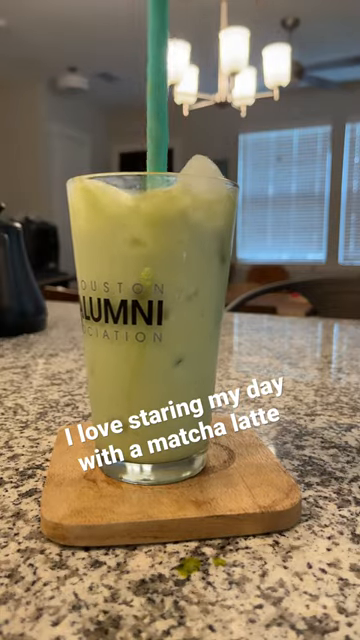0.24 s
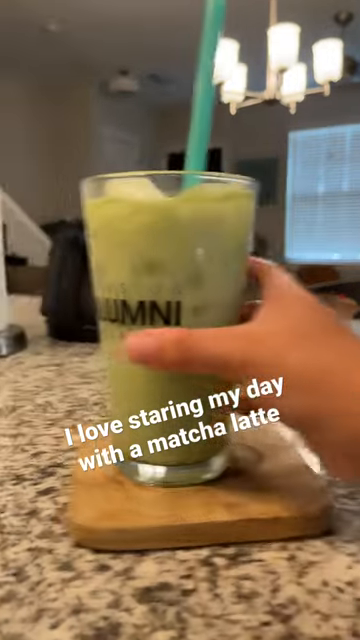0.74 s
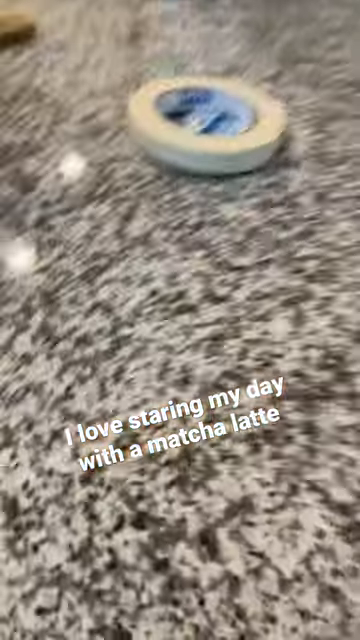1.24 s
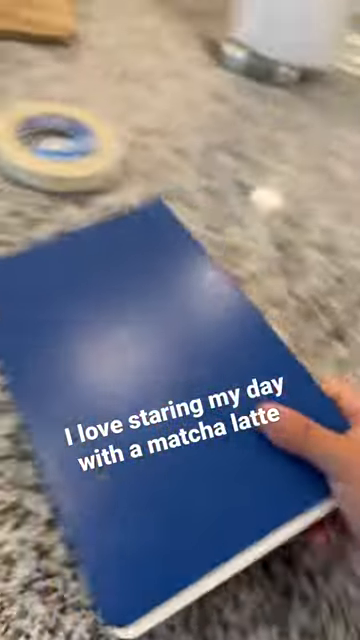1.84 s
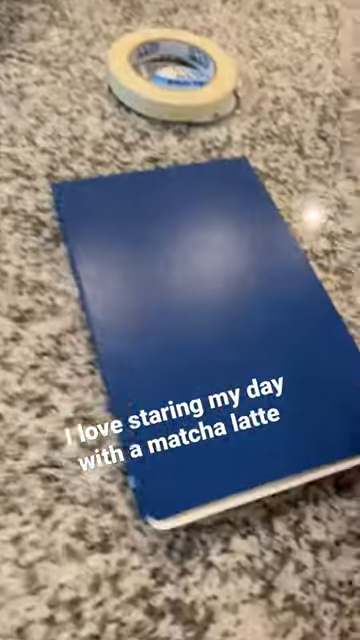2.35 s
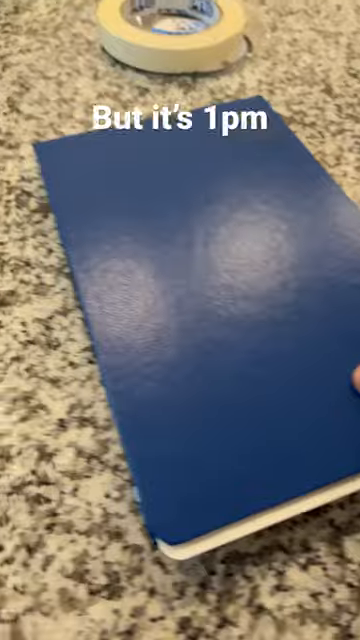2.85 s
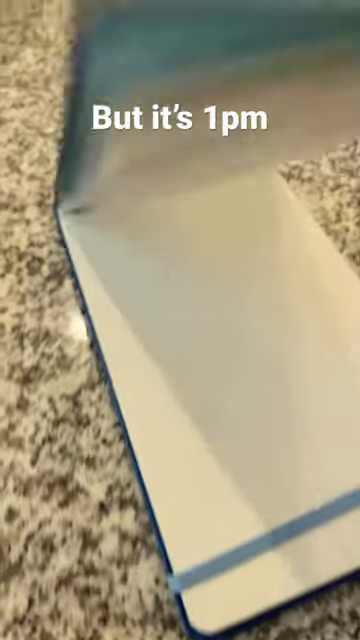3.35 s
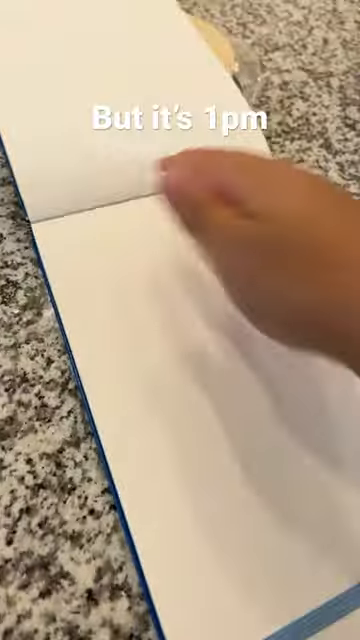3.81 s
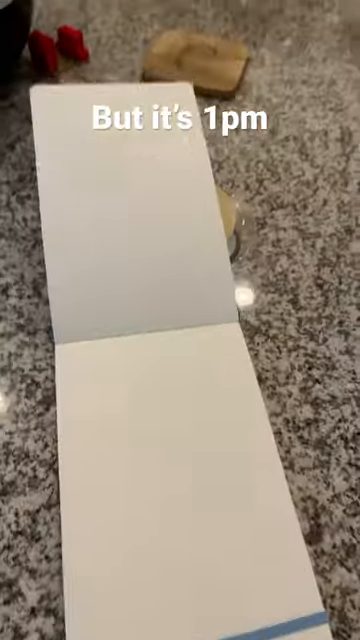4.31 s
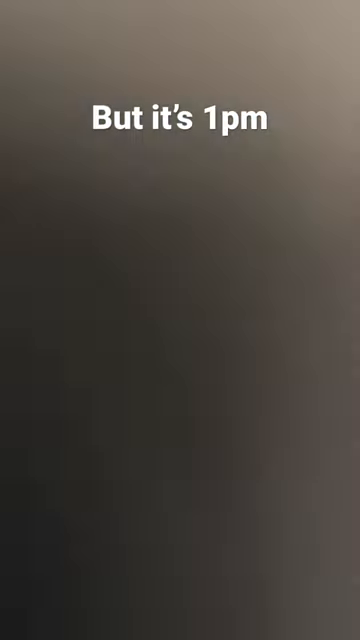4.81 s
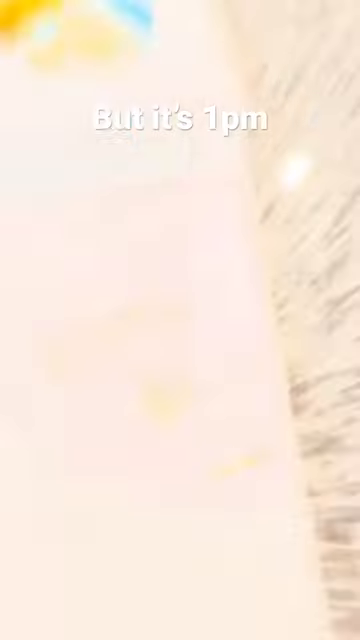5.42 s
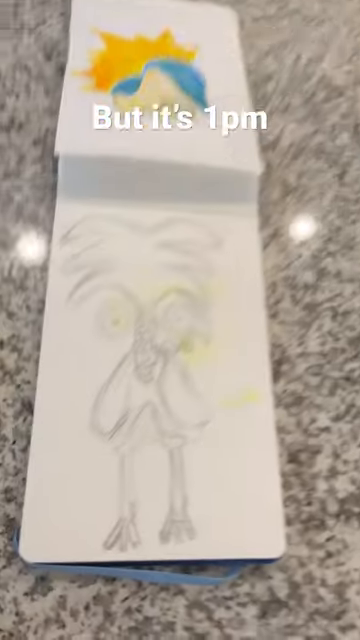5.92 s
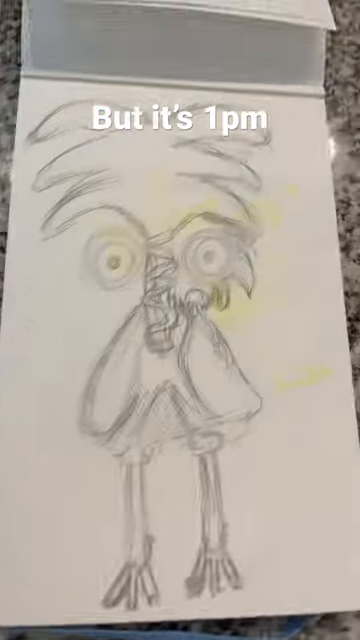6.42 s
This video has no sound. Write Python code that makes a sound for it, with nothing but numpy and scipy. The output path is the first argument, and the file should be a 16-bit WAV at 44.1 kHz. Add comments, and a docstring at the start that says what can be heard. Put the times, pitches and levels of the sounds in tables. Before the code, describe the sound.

Ice clinks in a stirred drink, a coaster scrapes on stone, then a sketchbook thuds, slaps open and the microphone is bumped.

```python
"""Ice swirls and clinks as a straw stirs a full glass, heard from a phone's microphone in a quiet kitchen.
The glass is dragged off on its wooden coaster, which grinds and catches on the stone counter.
A sketchbook slides in, drops flat with a thud and is flipped open, its cover slapping down.
Right at the microphone, the phone bumps onto the page and is tapped. Ventilation and a faint
appliance hum lie underneath; twice everything cuts to silence for an instant."""
import sys
import numpy as np
from scipy import signal
from scipy.fft import rfft, irfft
from scipy.io import wavfile
from scipy.ndimage import uniform_filter1d

SR = 44100
rng = np.random.default_rng(int(sys.argv[2]) if len(sys.argv) > 2 else 0)


def put_to_file(sound):
    """Save the sound as 16-bit audio at rate SR, in the file named by the first command-line argument."""
    columns = np.atleast_2d(sound).T  # one column per channel
    safe = np.clip(columns, -1, 1)
    whole_steps = np.round(safe * 32767)
    wavfile.write(sys.argv[1], SR, whole_steps.astype(np.int16))


N = 293706
TIME = np.arange(N) / SR
AGE = TIME[:SR // 2]  # seconds since a blow


def amp(db):
    """Decibels to gain."""
    return 10 ** (np.asarray(db) / 20)


def unit(x):
    """Scales to rms 1."""
    return x / np.sqrt(np.mean(x ** 2) + 1e-20)


def read(points, hz):
    """Reads a table on a log-frequency axis."""
    f, value = np.transpose(points)
    return np.interp(np.log(hz + 1), np.log(f + 1), value)


def level(rows):
    """Gain over time from a dB curve, fading 200 dB a second outside its span."""
    s, db = np.transpose(rows)
    outside = abs(TIME - np.clip(TIME, s[0], s[-1]))
    return amp(np.interp(TIME, s, db) - 200 * outside)


def add(mix, s, sound):
    """Mixes a sound in at s seconds."""
    part = mix[max(round(s * SR), 0):][:len(sound)]
    part += sound[:len(part)]


def colour(x, spectrum, peaks=(), peak_db=0):
    """Minimum-phase filter of energy 1: a broad spectrum with resonances standing out of it."""
    hz = abs(np.fft.fftfreq(4096, 1 / SR))
    gain = amp(read(spectrum, hz))
    for f, width, db in peaks:
        gain *= 1 + amp(peak_db + db / 2) / (1 + (2 * (hz - f) / width) ** 2)
    response = np.exp(signal.hilbert(np.log(gain + 1e-6)).conj())
    taps = np.fft.ifft(response).real[:len(hz) // 2]
    return signal.oaconvolve(x, taps / np.linalg.norm(taps))[:len(x)]


def burst(t60):
    """A contact: a puff of noise that dies at once."""
    return rng.standard_normal(len(AGE)) * amp(-60 * AGE / t60)


def ring(modes, pitch=1, build=0.5):
    """Damped modes after a blow, rising over `build` cycles; a raised pitch also dies sooner."""
    t = AGE * pitch
    return sum(amp(db - 60 * t / t60) * np.sin(2 * np.pi * hz * t) * np.minimum(hz * t / build, 1)
               for hz, db, t60 in modes)


def grains(per_s, spread_db):
    """Tiny random contacts, a few larger than the rest."""
    size = amp(spread_db * np.minimum(rng.exponential(1, N), 4))
    return unit(size * rng.choice([-1, 1], N) * (rng.random(N) < per_s / SR))


def uneven(depth_db, span_s):
    """Random swings in the pressure of a rubbing contact."""
    knots = np.arange(0, N / SR + 1, span_s)
    return amp(depth_db * np.interp(TIME, knots, rng.standard_normal(N)[:len(knots)]))


def stroke(s, rise, hold, fall, db):
    """Gain of one movement: swells until s, fades from s + hold; rise and fall are seconds per 20 dB."""
    early, late = np.maximum(s - TIME, 0), np.maximum(TIME - s - hold, 0)
    return amp(db - 20 * (early / rise + late / fall))


def together(gains):
    """Unrelated noises add in power."""
    return np.linalg.norm(gains, axis=0)


# The kitchen's reverberation. Each row: frequency in Hz, seconds to fall 60 dB (t60).
ROOM_DECAY = [(80, 0.56), (250, 0.34), (700, 0.63), (2500, 0.79), (6000, 0.64), (14000, 0.3)]


def room(x, wet_db, early_db=4, early_s=.04):
    """What the walls return to the microphone: strong early reflections, then a tail dying by band."""
    t = TIME[:SR]
    onset = np.clip((t - .003) / 0.008, 0, 1)
    taps = rng.standard_normal(SR) * onset * amp(early_db * np.exp(-t / early_s))
    taps /= np.linalg.norm(taps * amp(-90 * t))
    hz, age, bands = signal.stft(taps, SR, nperseg=256)
    decay = amp(-60 * age / read(ROOM_DECAY, hz)[:, None])
    tail = signal.istft(bands * decay, SR, nperseg=256)[1]
    return amp(wet_db) * signal.fftconvolve(x, tail)[:N]


def strikes(rows, modes, crack, echo, crack_t60, wet_db, build):
    """Each blow is a short crack plus the ring of the struck thing, and wakes the room by its strength."""
    rings, cracks, pushes = np.zeros((3, N))
    for s, ring_db, crack_db, *pitch in rows:
        add(rings, s, amp(ring_db) * ring(modes, *pitch, build=build))
        add(cracks, s, amp(crack_db) * burst(crack_t60))
        add(pushes, s, amp([ring_db]))
    return rings + colour(cracks, crack) + room(colour(pushes, echo), wet_db)


# Pushes of the straw. Each row: peak time in seconds, relative level in dB.
STRAW_PUSHES = [(0.0, -44), (0.329, -49.5)]
# Tone of the swirl and of the ticks. Each row: frequency in Hz, relative level in dB.
SWIRL_TONE = [(290, -41), (500, 8), (773, -4), (831, -2.5), (1440, 5.5), (2070, 0.5), (3200, 3.5),
              (3920, 1.5), (7640, -10), (16000, -35)]
TICK_TONE = [(290, -37), (500, -28), (750, 2), (831, -25), (1440, -1), (2100, -2), (3200, -4), (3540, 6.5),
             (7980, -6), (16000, -35)]
# Resonances of the full glass. Each row: frequency in Hz, width in Hz, weight in dB.
GLASS_PEAKS = [(1420, 300, -3.5), (2110, 210, 9), (2360, 49, 11), (3050, 50, -4), (3840, 85, -4),
               (5260, 230, -1), (7400, 210, -11)]
# Cubes hitting glass and each other. Each row: start in seconds, tick in dB, pitch in Hz, ring in dB.
CUBE_HITS = [(0.0886, -39, 2020, -43), (0.1295, -44, 6140, -42.5), (0.179, -57, 2460, -41),
             (0.233, -50, 1500, -36.5), (0.2485, -43, 2960, -37), (0.3058, -33, 2600, -30.5),
             (0.332, -27, 3800, -32), (0.3636, -29.5, 2050, -26), (0.385, -35.5, 2080, -34),
             (0.82, -39.5, 3460, -38), (0.9474, -40, 3440, -28.5), (1.017, -45, 3220, -32)]
# A cube's note. Each row: multiple of its pitch, relative level in dB, t60 in seconds.
CUBE_MODES = [(1, -2.5, 0.021), (.72, -16, 0.016), (1.75, -14.5, 0.027)]


def ice():
    """In the glass, each push of the straw sets small contacts swirling; whole cubes clink and ring."""
    contacts = grains(per_s=1500, spread_db=3.5) * uneven(depth_db=1.5, span_s=.008)
    motion = together([stroke(s, rise=0.073, hold=0, fall=0.44, db=db) for s, db in STRAW_PUSHES])
    motion *= stroke(0, rise=0.073, hold=0.47, fall=0.048, db=0.5)  # ends as the straw is let go
    swirl = unit(colour(contacts, SWIRL_TONE, GLASS_PEAKS, peak_db=-4)) * motion
    ticks, notes = np.zeros((2, N))
    for s, tick_db, hz, ring_db in CUBE_HITS:
        add(ticks, s, amp(tick_db) * burst(t60=0.012))
        modes = [(hz * multiple, db, t60) for multiple, db, t60 in CUBE_MODES]
        add(notes, s, amp(ring_db) * ring(modes))
    ticks = colour(ticks, TICK_TONE, GLASS_PEAKS, peak_db=-3)
    return amp(-2.5) * swirl + ticks + notes + room(swirl + notes, wet_db=-11) + room(ticks, wet_db=-3)


# The ventilation's tone. Each row: frequency in Hz, relative level in dB.
AIR_TONE = [(15, -51), (25, -46.5), (64, 1.5), (108, -10), (153, -2), (212, -3), (301, -0.5), (503, -9.5),
            (1020, -17), (1400, -26), (2550, -38.5), (9070, -39), (13600, -48.5), (14800, -39.5),
            (16000, -47)]
# Appliances in the background. Each row: frequency in Hz, rms level in dB.
APPLIANCE_HUM = [(160, -62), (318, -67), (1001, -82.5), (9022, -92.5)]


def room_tone():
    """All around the microphone: steady ventilation noise and a faint wavering hum."""
    tone = amp(read(AIR_TONE, np.fft.rfftfreq(N, 1 / SR)))
    out = amp(-56) * unit(irfft(rfft(rng.standard_normal(N)) * tone, N))
    for hz, db in APPLIANCE_HUM:
        waver_hz = 3 * unit(uniform_filter1d(rng.standard_normal(N), size=4000))
        out += amp(db) * np.sqrt(2) * np.sin(2 * np.pi * np.cumsum(hz + waver_hz) / SR)
    return out


# A nudge, then a growing pull. Each row: time in seconds, relative level in dB.
DRAG_EFFORT = [(.5, -70), (.572, -73), (.59, -48), (.65, -59.5), (.76, -56), (.825, -49), (.95, -48.5),
               (1.235, -45.5)]
# Tone of the grinding and of the low judder. Each row: frequency in Hz, relative level in dB.
GRIT_TONE = [(350, -24.5), (600, 4), (708, 8.5), (846, -8), (1260, 0), (2340, -10), (3340, -10), (5120, -6),
             (7830, -5), (16000, -18.5)]
JUDDER_TONE = [(40, -19), (90, 0.5), (200, 3), (380, 1), (520, -3), (650, -13), (900, -32), (2000, -22)]
# Resonances of the rubbed coaster. Each row: frequency in Hz, width in Hz, weight in dB.
COASTER_PEAKS = [(667, 22, -13), (1280, 210, -12), (3420, 450, 37), (5740, 420, 19), (6100, 66, -1),
                 (7080, 180, 13), (7830, 300, 17), (9500, 350, -4), (10800, 560, 15)]
# Catches on the stone. Each row: start in seconds, snap in dB, knock in dB.
COASTER_CATCHES = [(0.5785, -53, -39.5), (0.741, -37.5, -53), (0.806, -44, -49), (0.9735, -49, -41),
                   (1.1, -38, -43), (1.152, -44, -39), (1.165, -30.5, -37), (1.2195, -31.5, -37.5)]
# The knock of the wood. Each row: frequency in Hz, relative level in dB, t60 in seconds.
WOOD_MODES = [(634, 0.5, 0.027), (704, -4, 0.031), (1320, 1, 0.011)]


def coaster():
    """On the counter, wood grinds and judders over stone, catching now and then and singing in fits."""
    effort = level(DRAG_EFFORT)
    pressure = uneven(depth_db=3, span_s=.01) * effort
    grind = colour(grains(per_s=2200, spread_db=3) * pressure, GRIT_TONE) * amp(-4)
    fits = grains(per_s=2100, spread_db=3) * pressure * uneven(depth_db=3.5, span_s=.02)
    sing = colour(fits, GRIT_TONE, COASTER_PEAKS, peak_db=9) * amp(-6)
    judder = unit(colour(grains(per_s=1300, spread_db=0.5), JUDDER_TONE)) * amp(-27) * np.sqrt(effort)
    snaps, knocks = np.zeros((2, N))
    for s, snap_db, knock_db in COASTER_CATCHES:
        add(snaps, s, amp(snap_db) * burst(t60=0.012))
        add(knocks, s, amp(knock_db) * ring(WOOD_MODES))
    snaps = colour(snaps, [(500, 0), (3500, 7), (9000, 3), (16000, -10)])
    out = grind + sing + snaps + knocks + judder
    return out + room(out, wet_db=-11)


# Card, paper and sleeve sliding. Each row: peak time, rise, hold and fall in seconds, hiss and body in dB.
PAPER_STROKES = [(1.487, 0.17, 1.386, 0.36, -68.5, -65), (1.827, 0.027, 0.0092, .15, -64.5, -64),
                 (2, 0.19, 0.062, 0.32, -50, -57.5), (3.177, .05, 0.011, 0.22, -62, -70),
                 (3.279, 0.037, 0.0079, 0.4, -53, -59), (3.548, 0.051, 0.12, 0.47, -58, -56),
                 (4.1, 0.17, .03, 1, -71, -60.5), (4.25, 0.27, 0.12, 0.049, -71.5, -66.5),
                 (5.35, 0.13, 0.03, 0.57, -64, -66)]
# The cover rubbing as it swings. One row: peak time, rise, hold and fall in seconds, level in dB.
COVER_RUB = (3.5, 0.35, -0.3, 0.75, -58)
# Tone of the hiss, its low body and the rub. Each row: frequency in Hz, relative level in dB.
HISS_TONE = [(1760, -26.5), (3000, -7), (3860, -3.5), (6760, -2.5), (8460, -8.5), (10900, -11.5),
             (12100, -19), (14500, -15.5), (16000, -25)]
BODY_TONE = [(700, -18.5), (1500, -0.5), (2800, -6.5), (4000, -11.5), (6000, -24.5)]
COVER_RUB_TONE = [(900, -26), (1400, -4), (1600, 0), (1900, -5), (3000, -14), (8000, -28)]
# The spine opening. Each row: start in seconds, level in dB.
SPINE_CREAKS = [(3.271, -54), (3.4218, -47), (3.5458, -40)]


def paper():
    """Fine friction under each stroke across the counter, and small creaks of the spine."""
    hiss_gain = together([stroke(*timing, db) for *timing, db, _ in PAPER_STROKES])
    body_gain = together([stroke(*timing, db) for *timing, _, db in PAPER_STROKES])
    hiss = unit(colour(grains(per_s=12000, spread_db=2), HISS_TONE)) * hiss_gain
    body = unit(colour(grains(per_s=8000, spread_db=4), BODY_TONE)) * body_gain
    rub = unit(colour(grains(per_s=3900, spread_db=2), COVER_RUB_TONE)) * stroke(*COVER_RUB)
    creaks = np.zeros(N)
    for s, db in SPINE_CREAKS:
        add(creaks, s, amp(db) * burst(t60=0.017))
    out = (amp(-1) * hiss + amp(-5) * body + rub) * uneven(depth_db=1.2, span_s=0.011)
    out += colour(creaks, [(600, -6), (2000, 4), (6000, 2.5), (15000, -19)])
    return out + room(out, wet_db=-10)


# The closed book meeting the stone. Each row: start in seconds, ring in dB, crack in dB.
DROP_HITS = [(2.0795, -46.5, -39.5), (2.0925, -37, -56), (2.1925, -15.5, -19.5), (2.2028, -34, -26.5)]
# Its thud. Each row: frequency in Hz, relative level in dB, t60 in seconds.
DROP_MODES = [(85.6, -24.5, 0.48), (282, -11.5, 0.12), (338, -5, 0.053), (386, -25, 0.052),
              (750, -7, 0.068), (875, -19, 0.011), (1140, -15, 0.036), (1560, -12, 0.017)]
# Tone of its crack and of what it throws into the room. Each row: frequency in Hz, relative level in dB.
DROP_CRACK = [(290, -75), (500, -28), (586, -35), (761, -7.5), (1950, -22.5), (2330, -32), (5160, -27),
              (11100, -41.5), (16000, -65)]
DROP_ECHO = [(29, -39), (50, -10), (86, -9), (122, -14), (151, -6), (201, -11), (273, 2), (346, -5.5),
             (504, -16), (847, -10), (2750, -35), (6580, -36), (14000, -51)]


def book_drop():
    """The sketchbook falls flat on the counter with a thud that fills the kitchen."""
    return strikes(DROP_HITS, DROP_MODES, DROP_CRACK, DROP_ECHO, crack_t60=0.016, wet_db=18.5, build=0.33)


# Knocks on the phone: finger taps, and a tick as it is lifted off the page. Each row: start in seconds, ring in
# dB, crack in dB, pitch factor.
PHONE_KNOCKS = [(2.898, -39.5, -57, 1.18), (4.6445, -36, -64, 1.06), (5.2184, -28, -37, 2.9),
                (5.2196, -32.5, -63, 1.36), (6.3452, -23.5, -35, 1.09), (6.4292, -35.5, -40.5, 0.97)]
# The phone's case. Each row: frequency in Hz, relative level in dB, t60 in seconds.
CASE_MODES = [(410, -9, 0.027), (528, 5.5, 0.015), (745, -11, 0.057), (1500, -8, 0.0062)]
# Tone of a tap's crack and echo. Each row: frequency in Hz, relative level in dB.
TAP_TONE = [(500, -8), (1500, 4.5), (2400, 2), (4000, -6), (9000, -12.5), (16000, -29.5)]


def phone_taps():
    """Knocks reach the microphone through the case, so they are nearly dry."""
    return strikes(PHONE_KNOCKS, CASE_MODES, TAP_TONE, TAP_TONE, crack_t60=0.0081, wet_db=-9, build=1)


# The cover landing. Each row: start in seconds, ring in dB, crack in dB.
SLAP_HITS = [(3.8446, -43, -25), (3.8518, -14.5, -23.5), (3.856, -25.5, -22), (3.8645, -24.5, -43),
             (3.8855, -32.5, -23.5), (3.8975, -29.5, -34), (4.0535, -37, -47)]
# Its ring. Each row: frequency in Hz, relative level in dB, t60 in seconds.
SLAP_MODES = [(222, -2.5, 0.027), (417, -5, 0.034), (800, -1.5, 0.054), (860, -5.5, 0.036),
              (1080, -7, 0.047), (1330, -7, 0.039), (1527, -3, 0.065), (2570, -14, 0.038),
              (3400, -9.5, 0.023)]
# Tone of its crack and of what it throws into the room. Each row: frequency in Hz, relative level in dB.
SLAP_CRACK = [(240, -47), (400, -7.5), (616, -12.5), (742, -15), (921, -25.5), (1530, -7), (2180, -11),
              (2590, -13), (5690, -16), (16000, -48)]
SLAP_ECHO = [(88, -36.5), (150, -20.5), (212, -27), (273, -5), (343, -9), (687, -8.5), (883, -2.5),
             (1070, -7), (1570, -7), (1730, -11), (5300, -23.5), (15000, -42)]


def cover_slap():
    """The cover slaps onto the counter and bounces, and the walls answer."""
    return strikes(SLAP_HITS, SLAP_MODES, SLAP_CRACK, SLAP_ECHO, crack_t60=0.018, wet_db=17, build=0.65)


# Low thumps of the phone: the heavy one as it lands on the page, and softer ones as it is handled. Each row:
# start in seconds, level in dB, end pitch in Hz, length in seconds.
LOW_THUMPS = [(4.14, -45, 95, 0.034), (4.303, -49.5, 79, 0.032), (4.918, -11, 70, 0.045),
              (5.222, -40.5, 114, 0.02), (6.346, -49.5, 75.4, 0.039)]


def phone_thumps():
    """Low thumps right at the microphone, as the phone lands on the page and is handled: soft bounces, sagging
    in pitch as the pressure eases."""
    out = np.zeros(N)
    for s, db, hz, length in LOW_THUMPS:
        progress = AGE[AGE < length] / length
        sagging_hz = hz * (1 + 2.8 * np.exp(-progress / 0.13))
        swell = np.sin(np.pi * progress ** .7) ** 3
        add(out, s, amp(db) * swell * np.sin(2 * np.pi * np.cumsum(sagging_hz) / SR))
    return out


# The phone meeting the page. Each row: start in seconds, ring in dB, crack in dB.
BUMP_HITS = [(4.9125, 0, -24), (4.9142, -40, -6.5)]
# The pile of pages under it. Each row: frequency in Hz, relative level in dB, t60 in seconds.
PAGE_MODES = [(130, -14, .05), (182, -8, .047), (255, -9, .04), (388, -20, .03), (520, 8, .0195),
              (910, -13, .026), (1250, -19, .033), (1925, -32, .12), (2300, -35, .08)]
# Tone of the crack, the echo and the scuff. Each row: frequency in Hz, relative level in dB.
BUMP_CRACK = [(400, -20), (800, -4), (1500, -8), (3200, -3), (4500, -11), (9500, -10), (16000, -21)]
BUMP_ECHO = [(180, -34.5), (300, -3.5), (409, -5.5), (577, -1.5), (1210, -17.5), (1400, -22.5),
             (1940, -15.5), (2040, -23), (6100, -29.5), (15000, -36.5)]
SCUFF_TONE = [(120, -69), (200, -13), (646, 6), (1460, -11.5), (1660, -10), (2780, -8), (4490, -27),
              (5650, -24), (7510, -24), (14000, -39.5)]


def phone_landing():
    """A close, nearly dry bump; the phone's edge ploughs over the paper and comes to rest."""
    bump = strikes(BUMP_HITS, PAGE_MODES, BUMP_CRACK, BUMP_ECHO, crack_t60=0.0016, wet_db=-3.5, build=1.76)
    since = TIME - BUMP_HITS[0][0]
    scuff_db = -10 - 60 * np.maximum(-since / .028, since / 0.027)  # peaks at the landing
    return bump + colour(rng.standard_normal(N) * amp(scuff_db), SCUFF_TONE)


# Brief silences. Each row: start in seconds, end in seconds.
SILENCES = [(1.2355, 1.2695), (5.235, 5.2533)]


def scene():
    """One microphone at the counter: the drink up to the first silence, then the sketchbook and phone."""
    drink = (ice() + coaster()) * (TIME < SILENCES[0][1])
    sketchbook = paper() + book_drop() + cover_slap()
    phone = phone_taps() + phone_thumps() + phone_landing()
    return (drink + sketchbook + phone + room_tone())[None]


def record(dry):
    """The phone's mono track: muted in the two silences, with nothing above about 16 kHz."""
    running = np.prod([(TIME < start) | (TIME > end) for start, end in SILENCES], axis=0)
    low_pass = signal.firwin(511, 15900, window=("kaiser", 9), fs=SR)
    return signal.oaconvolve(dry * running, low_pass[None], "same")


dry = scene()
out = record(dry)
put_to_file(out)
```